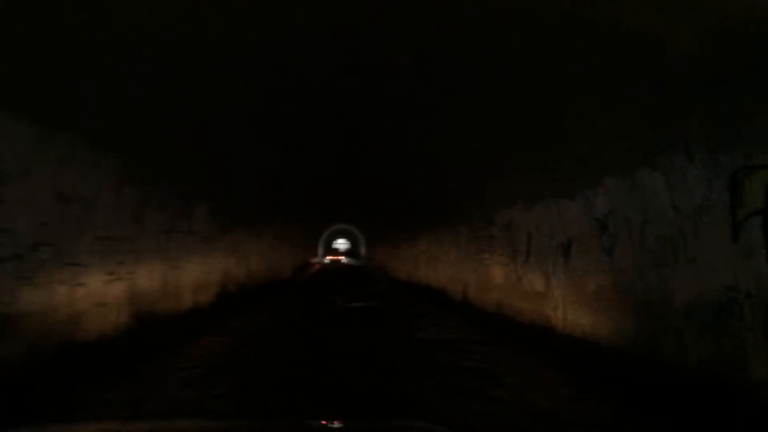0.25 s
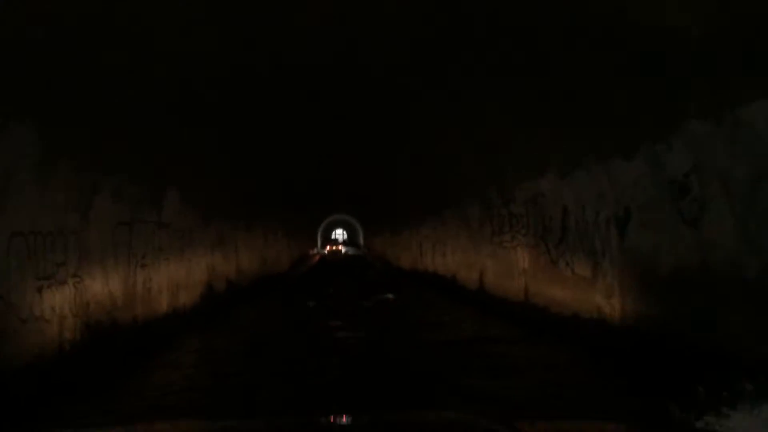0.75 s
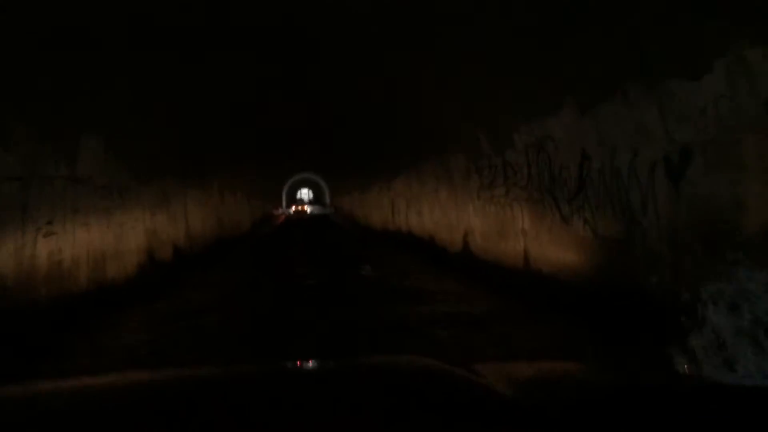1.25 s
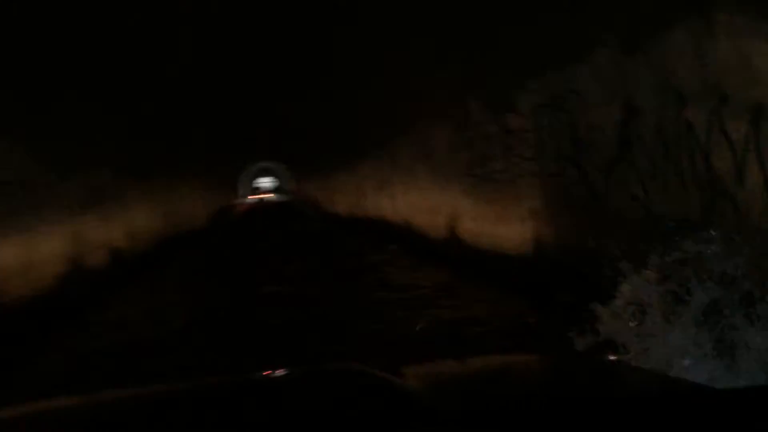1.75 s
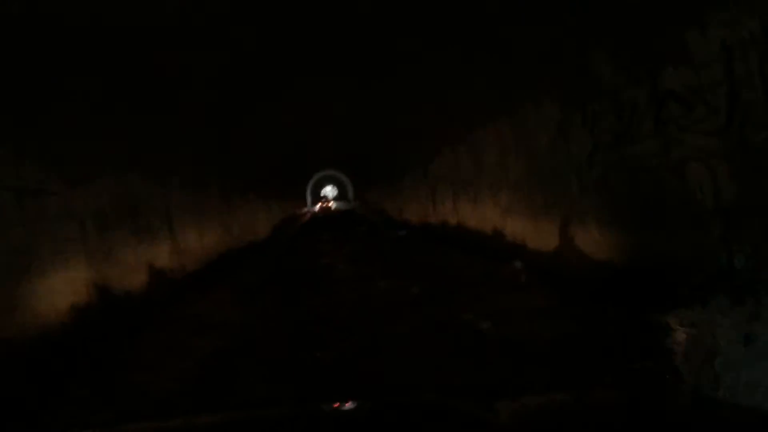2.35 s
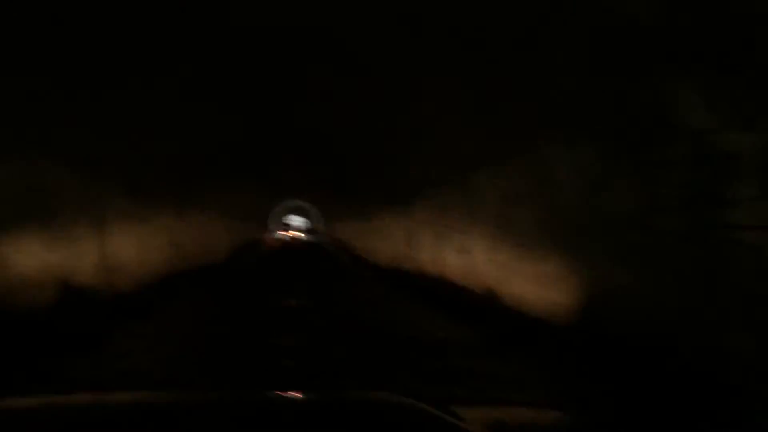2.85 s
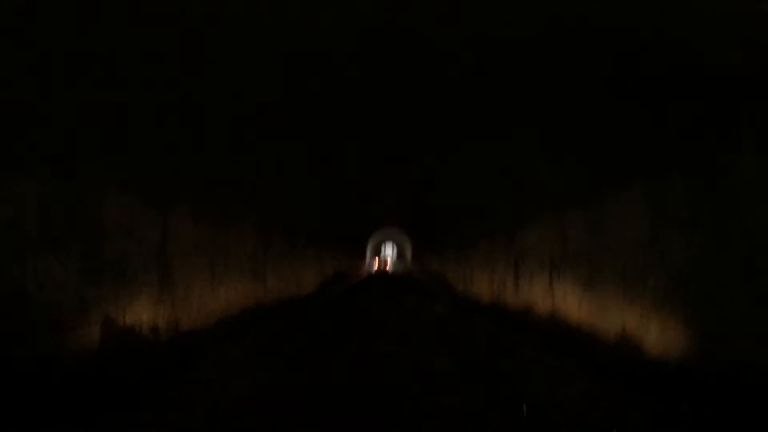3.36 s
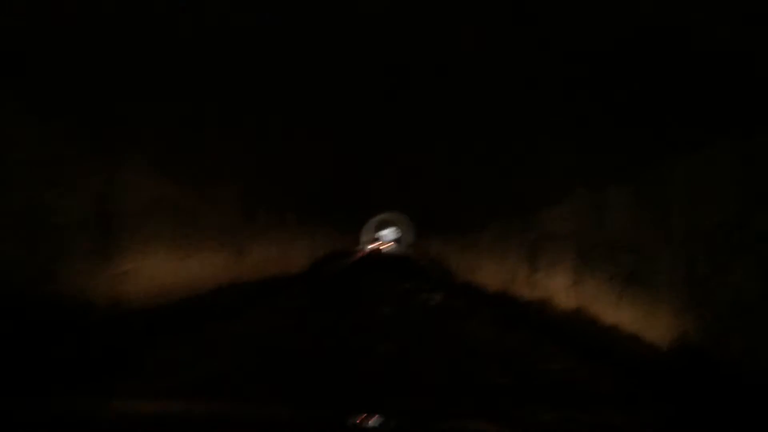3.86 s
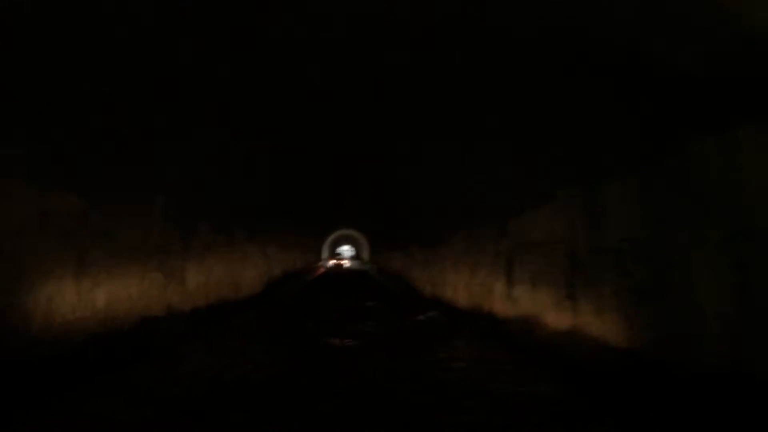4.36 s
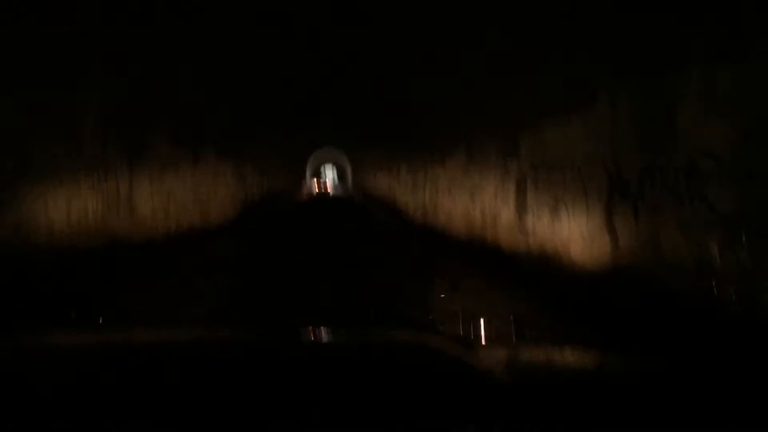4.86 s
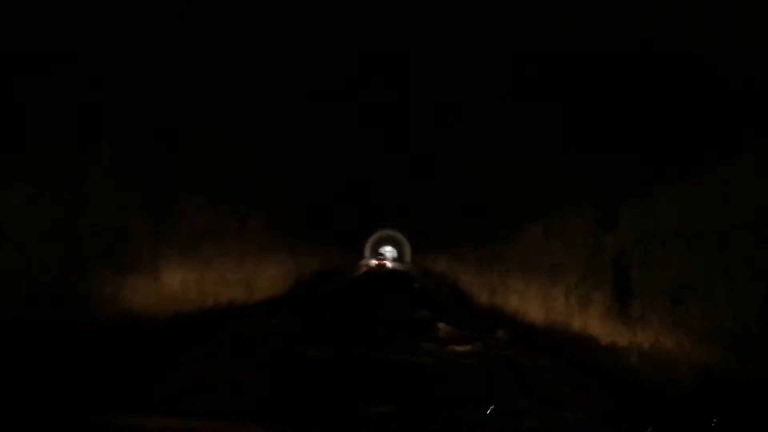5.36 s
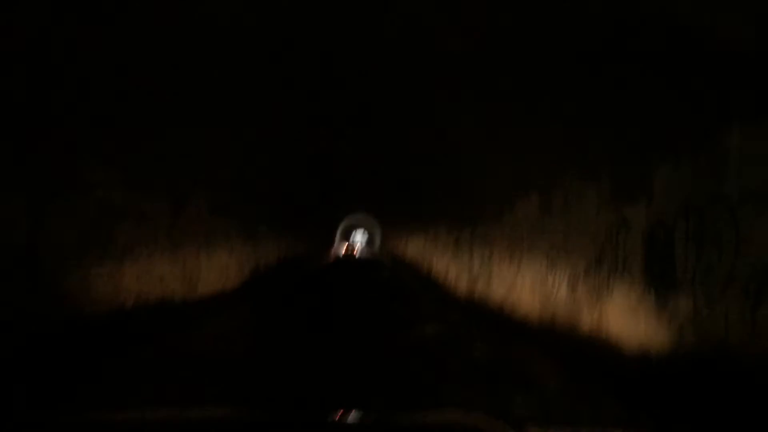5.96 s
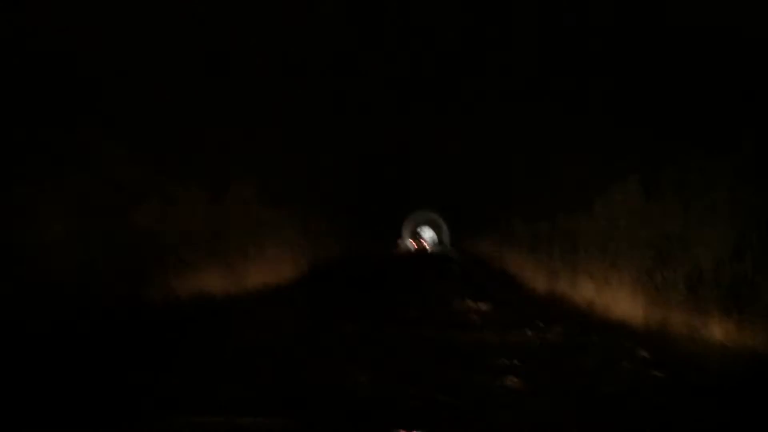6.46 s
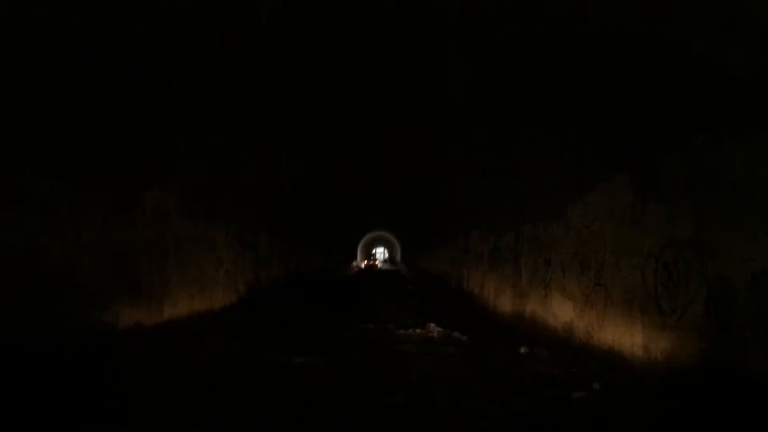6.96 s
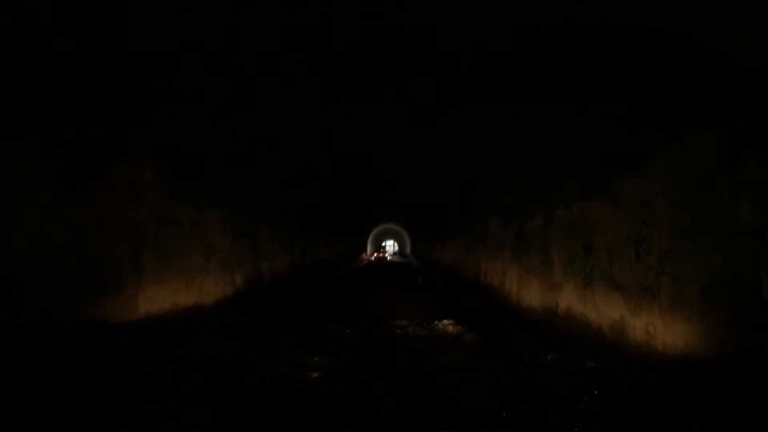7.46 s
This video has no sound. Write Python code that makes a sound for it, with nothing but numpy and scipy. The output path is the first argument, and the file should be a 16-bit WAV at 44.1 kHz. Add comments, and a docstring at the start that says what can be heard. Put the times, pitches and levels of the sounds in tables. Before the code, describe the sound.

Inside a car crawling over rough ground in a tunnel: low wavering engine drone, boomy rumble, soft thumps and faint tyre hiss.

```python
"""A car crawls along the rough floor of a stone tunnel, heard in the cabin through one small microphone.
From the start, low engine orders drone as wavering sines beside a second, independent hum; noise bands
give cabin boom, tyre roar and spray hiss. Damped sines add low thumps and engine-beat pulses from 0.6 s.
One trim tick sounds at 3.6 s; the engine steps up near 4 s while the hum is all but gone.
Thumps crowd at 5.4-6 s, the hum returns, a second tick sounds at 6.9 s and strong thumps end the scene."""
import sys
import numpy as np
from scipy import signal
from scipy.fft import rfft, irfft, next_fast_len
from scipy.io import wavfile
from scipy.ndimage import uniform_filter1d, map_coordinates

SR = 44100
rng = np.random.default_rng(int(sys.argv[2]) if len(sys.argv) > 2 else 0)


def log_audio(samples):
    """Write samples as a 16-bit WAV file to the path given in sys.argv[1]."""
    # one column per channel
    frames = np.atleast_2d(samples).T
    # limit to full scale, then quantise
    limited = np.clip(frames, -1, 1)
    pcm = np.round(limited * 32767).astype(np.int16)
    wavfile.write(sys.argv[1], SR, pcm)


N = 340532


def amp(db):
    """Gain of a level in dB."""
    return 10 ** (np.asarray(db) / 20)


def unit(x):
    """x at rms 1."""
    return x / np.sqrt(np.mean(x ** 2) + 1e-20)


def curves(rows):
    """Each column after the time, interpolated to one value per sample."""
    knot_s, *columns = np.transpose(rows)
    t_s = np.arange(N) / SR
    return [np.interp(t_s, knot_s, column) for column in columns]


def wobble(rate_hz):
    """Smooth random curve with rate_hz knots a second."""
    knots = rng.standard_normal(int(N * rate_hz / SR) + 4)
    return map_coordinates(knots, [np.arange(N) * rate_hz / SR])


def filtered(x, response):
    """x times a response of frequency, in the spectrum."""
    m = next_fast_len(N + SR // 2)
    hz = np.fft.rfftfreq(m, 1 / SR)
    return irfft(rfft(x, m) * response(hz), m)[..., :N]


def drone(turns, db, waver_rad, flutter_db):
    """Sine around rms level db; phase and level waver at random."""
    phase = 2 * np.pi * (turns + rng.random()) + waver_rad * wobble(9)
    level_db = db + flutter_db * wobble(15)
    return np.sqrt(2) * amp(level_db) * np.sin(phase)


def engine():
    """Multiples of the shaft speed; the upper ones sing out as they cross an exhaust resonance."""
    # Each row: time in seconds, shaft speed in Hz, rms level of order 2 and of order 3 in dB before throb.
    shaft_rows = [(0, 34.24, -10.5, -20), (.32, 32.73, -19, -50), (.46, 33.2, -10.5, -26.5),
                  (.66, 36.63, -15.5, -21.5), (.81, 37.23, -20.5, -24), (1.25, 37.24, -12.5, -22),
                  (1.68, 37.9, -25, -28.5), (1.88, 37.84, -14, -28.5), (2.25, 38.82, -29, -26.5),
                  (2.58, 38.27, -31, -24), (2.8, 38.34, -19.5, -24), (3.02, 38.37, -22, -30),
                  (3.25, 37.16, -8.5, -30), (3.46, 36.19, -29.5, -28), (3.64, 35.16, -15.5, -28),
                  (3.9, 35.2, -13, -24), (4.12, 42.5, -26, -33.5), (4.33, 43.76, -24, -19),
                  (4.58, 44.66, -37, -24), (4.98, 45, -26, -12.5), (5.36, 44.63, -30, -24.5),
                  (5.66, 44.58, -29.5, -22.5), (6.05, 44.5, -32, -33.5), (6.4, 44.64, -48, -36),
                  (6.68, 44.98, -25, -35), (7.15, 44.52, -46, -42), (7.45, 44.88, -38, -39),
                  (7.58, 44.17, -20, -21.5), (7.72, 43.5, -28.5, -27)]
    # Uneven firing, once every third turn. Each row: time in seconds, depth 0-1.
    throb_rows = [(0, 0.07), (.5, 0.57), (1.3, 0.35), (1.8, 0.07), (2.8, .35), (4, 0.16), (5, .08),
                  (7.72, 0.18)]
    # Upper orders. Each row: multiple of shaft speed, exhaust resonance in Hz, its width in Hz,
    # level in dB on resonance with order 3 at load_ref_db.
    upper_rows = [(4, 160, 26.3, -29), (5, 222, 17, -36), (6, 231, 7, -32)]
    load_ref_db, load_share, swell_db = -23.5, 0.38, 2

    shaft_hz, second_db, third_db = curves(shaft_rows)
    turns = np.cumsum(shaft_hz) / SR
    depth = np.clip(curves(throb_rows)[0], 0, 1)
    throb = 1 + depth * np.cos(2 * np.pi * turns / 3 + 2.05 * wobble(2.946))

    load_db = load_share * (third_db - load_ref_db)
    orders = [(2, second_db), (3, third_db)]
    for k, pipe_hz, width_hz, db in upper_rows:
        detuning = 2 * (round(k) * shaft_hz - pipe_hz) / width_hz
        pipe_db = -10 * np.log10(1 + detuning ** 2)
        orders.append((round(k), db + pipe_db + load_db + swell_db * wobble(5)))
    return throb * sum(drone(k * turns, db, waver_rad=0.21, flutter_db=2.0) for k, db in orders)


def knocks(events, rise_s, grit_rad):
    """Short damped rings with a soft start; grit scrambles their phase."""
    out, t_s = np.zeros(N + SR), np.arange(SR // 4) / SR
    for start_s, peak_db, hz, t60_s in events:
        decay = amp(-60 * t_s / abs(t60_s))
        envelope = decay * (1 - np.exp(-(t_s / rise_s) ** 2))
        grit = grit_rad * np.cumsum(rng.standard_normal(len(t_s)))
        ring = np.sin(2 * np.pi * hz * t_s + grit)
        start = round(start_s * SR)
        out[start:start + len(t_s)] -= amp(peak_db) * envelope / envelope.max() * ring
    return out[:N]


def low_thumps():
    """Low thumps and engine-beat pulses in the cabin's boom range: clean, slow-rising rings."""
    # Each row: start in seconds, envelope peak in dB, pitch in Hz, t60 in seconds.
    thump_rows = [(.61, -10, 72.28, 0.077), (1.42, -10.5, 75.6, .08), (1.953, -9.5, 80.03, 0.081),
                  (2.783, -14, 75, 0.096), (3.11, -8.5, 75.3, 0.097), (3.65, -11, 76, 0.096),
                  (4.118, -10.5, 80.1, .1), (5.435, -16, 91, .07), (5.512, -8.5, 69.9, 0.14),
                  (5.613, -13, 80.9, 0.081), (5.69, -12, 72, 0.091), (5.743, -8.5, 75.5, .09),
                  (5.94, -8.5, 82, 0.073), (7.308, -5, 68.1, 0.17), (7.458, -22, 80.3, 0.066),
                  (7.506, -12.5, 74.2, 0.11), (7.538, -6, 76.3, 0.14), (7.59, -4.5, 76, 0.11)]
    return knocks(thump_rows, rise_s=0.014, grit_rad=0)


def hum():
    """Fainter tone that does not follow the shaft."""
    # Each row: time in seconds, pitch in Hz, rms level in dB before flutter.
    hum_rows = [(0, 144, -26), (.4, 144.8, -37), (1.1, 143, -36), (1.8, 140, -28.5), (2.1, 138.3, -33),
                (2.4, 137.3, -30), (2.65, 137.8, -38), (2.9, 137.6, -25.5), (3.5, 135.8, -29.5),
                (3.8, 135.6, -55), (5.55, 144, -55), (5.95, 143.8, -28), (6.5, 144.9, -26.5),
                (6.7, 144.3, -37), (6.87, 144, -23), (7.05, 144.4, -37.5), (7.3, 146.6, -24.5),
                (7.72, 150, -48)]
    hz, db = curves(hum_rows)
    return drone(np.cumsum(hz) / SR, db, waver_rad=0.17, flutter_db=1.7)


def cabin_boom():
    """The rough floor shakes the cabin air: lumpy noise through the cabin resonances."""
    # Each row: resonance in Hz, width in Hz, relative level in dB.
    cabin_rows = [(55.7, 28.4, -5), (73.8, 14.5, 0.5), (127, 20.2, -8), (175.4, 45, -10), (231, 116, -15.5)]
    # How hard the floor shakes the cabin. Each row: time in seconds, boom level in dB.
    shake_rows = [(0, -23), (.5, -24.5), (1.5, -24), (2, -25.5), (2.4, -21), (2.8, -26.5), (3.2, -25),
                  (4.3, -22), (4.8, -25), (6.1, -24), (6.8, -26.5), (7.2, -22.5), (7.72, -21)]

    def cabin(f):
        """Resonant band-passes summed with alternating sign, tapered at both ends."""
        total = 0
        for k, (centre_hz, width_hz, db) in enumerate(cabin_rows):
            damping = 1j * f * width_hz
            total = total + (-1) ** k * amp(db) * damping / (centre_hz ** 2 - f * f + damping)
        soft_trim = 1 + (f / 240) ** 6  # soaks up the top
        window_leak = 1 + (38 / (f + 1)) ** 2  # loses the deepest bass
        return total / soft_trim / window_leak

    shaking = amp(1.6 * wobble(22)) * rng.standard_normal(N)  # stones come unevenly
    boom_db, = curves(shake_rows)
    return amp(boom_db) * unit(filtered(shaking, cabin))


def rush(spectrum, patchy_db):
    """Noise of rms 1 in a given colour, with time-frequency patches of random gain."""
    z = signal.stft(rng.standard_normal(N), nperseg=512)[2]
    field = uniform_filter1d(rng.standard_normal(z.shape), 12, axis=0)
    field = uniform_filter1d(field, 10, axis=1)
    noise = signal.istft(z * amp(patchy_db * unit(field)), nperseg=512)[1][:N]
    knot_hz, db = np.transpose(spectrum)

    def colour(f):
        """Gain interpolated over log frequency."""
        return amp(np.interp(np.log(f + 1), np.log(knot_hz), db, -120, db[-1]))

    return unit(filtered(noise, colour))


def tyres_and_spray():
    """Tyres roar and throw spray: five coloured noises on three level curves."""
    # Each row: time in seconds, then guide levels in dB of spray hiss, tread rush and tyre roar.
    road_rows = [(0.0, -39, -40, -35), (0.04, -40.5, -38.5, -39), (0.64, -42, -42, -41.5),
                 (1.33, -42, -40.5, -39.5), (1.4, -42.5, -43, -43), (1.66, -39, -39.5, -38.5),
                 (2.17, -40, -41, -38.5), (2.21, -37.5, -39, -37), (3.01, -39.5, -39, -36),
                 (3.05, -37.5, -37.5, -38), (3.35, -43.5, -43, -41), (3.61, -40, -39, -39.5),
                 (3.98, -43.5, -42.5, -41.5), (4.67, -40, -38, -35), (4.9, -42.5, -40, -40),
                 (5.29, -42, -41, -40), (5.5, -38.5, -38, -35.5), (5.89, -42.5, -39.5, -40),
                 (6.34, -37.5, -36, -36), (6.45, -39.5, -36.5, -36), (6.77, -35.5, -34.5, -35.5),
                 (7.31, -40, -37.5, -35.5), (7.37, -42.5, -38.5, -38), (7.72, -47, -41.5, -41)]
    # Noise colours, low to high. Each row: frequency in Hz, relative density in dB per Hz.
    roar_colour = [(150, -43), (260, 1), (370, -4.5), (430, -2.5), (540, -6), (800, -33.5)]
    carcass_colour = [(400, -18.5), (570, -5.5), (700, -0.5), (820, -5.5), (950, -2.5), (1200, -10),
                      (2000, -32)]
    tread_colour = [(600, -31), (1100, -2.5), (1500, 0), (2100, -0.5), (2800, -4.5), (6000, -31)]
    spray_colour = [(700, -9), (2000, -4), (3500, -1.5), (6000, -4.5), (10000, -10), (15500, -20)]
    fizz_colour = [(4000, -30), (8000, -5), (12000, -1.5), (15500, -2)]  # the finest spray
    hiss_db, tread_db, tyre_db = curves(road_rows)
    ref_db = -40

    # low roar and fizz: level at ref_db plus a share of the guide's swings
    roar_db = -40 + 0.92 * (tyre_db - ref_db)
    fizz_db = -48.5 + 1.3 * (hiss_db - ref_db)
    splash_db = 0.5 * wobble(14)  # tread, spray and fizz flicker together

    roar = amp(roar_db) * rush(roar_colour, patchy_db=0.84)
    carcass = amp(tyre_db - 1.0) * rush(carcass_colour, patchy_db=0.2)
    tread = amp(tread_db + 0.15 * splash_db) * rush(tread_colour, patchy_db=1.23)
    spray = amp(hiss_db + splash_db) * rush(spray_colour, patchy_db=0.5)
    fizz_db = fizz_db + 1.5 * splash_db + 1.5 * wobble(8)
    fizz = amp(fizz_db) * rush(fizz_colour, patchy_db=2.2)
    return roar + carcass + tread + spray + fizz


def trim_ticks():
    """Faint ticks of loose trim: fast, phase-scrambled rings."""
    # Each row: start in seconds, envelope peak in dB, pitch in Hz, t60 in seconds.
    tick_rows = [(3.6212, -27, 2150, 0.038), (6.9202, -25, 2160, 0.03)]
    return knocks(tick_rows, rise_s=0.0025, grit_rad=0.16)


def scene():
    """Sum of all sources at the microphone, one channel."""
    mix = engine() + low_thumps() + hum() + cabin_boom() + tyres_and_spray() + trim_ticks()
    return mix[None]


def record(dry):
    """Peaks are rounded softly; nothing is kept above the band limit."""
    top_hz = 15350
    soft = dry / (1 + np.abs(dry / 1.16) ** 4) ** 0.23
    return filtered(soft, lambda hz: hz < top_hz)


dry = scene()
out = record(dry)
log_audio(out)
```